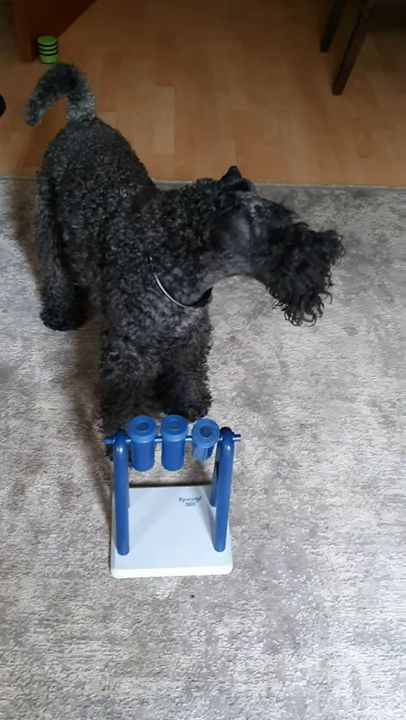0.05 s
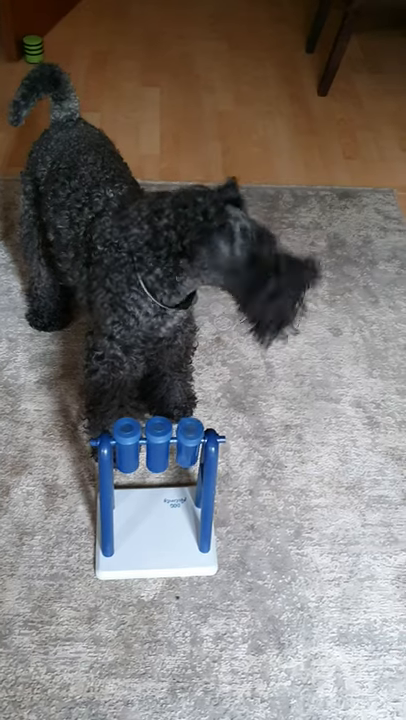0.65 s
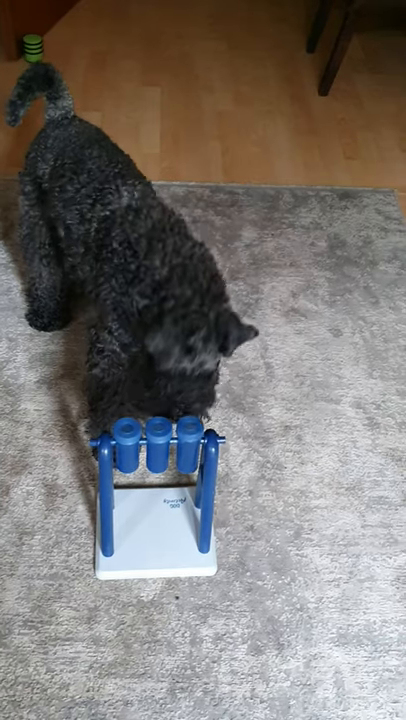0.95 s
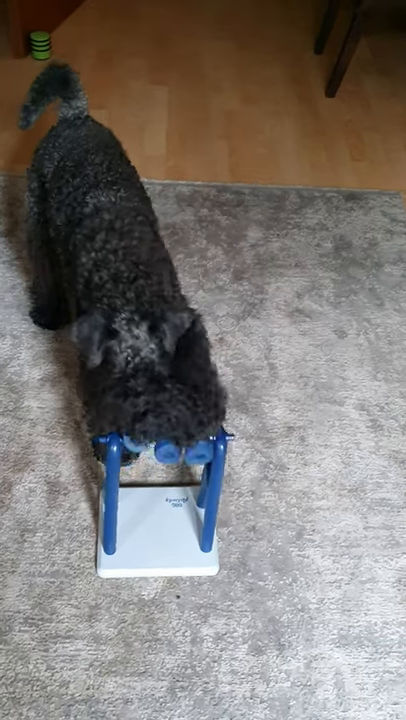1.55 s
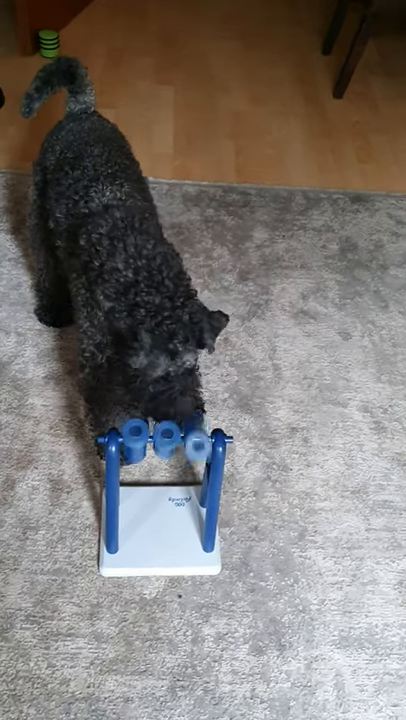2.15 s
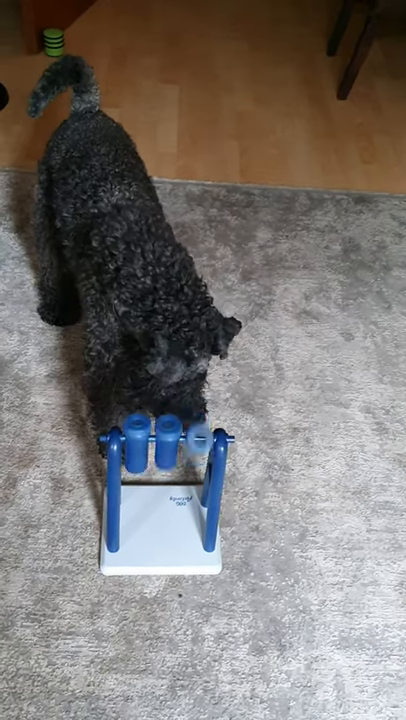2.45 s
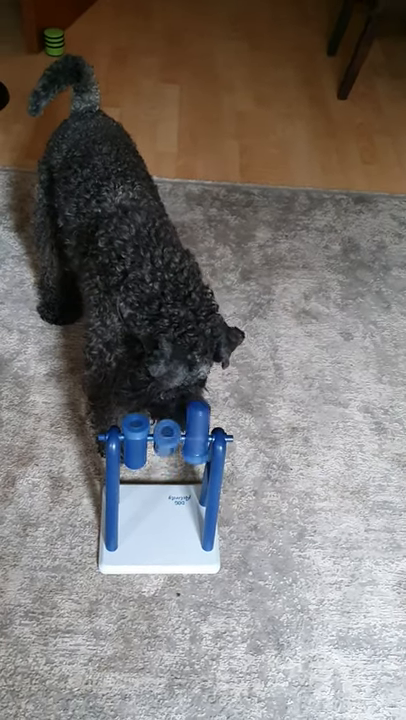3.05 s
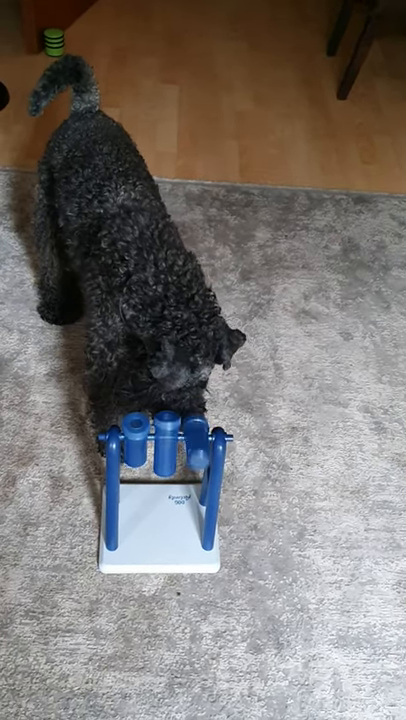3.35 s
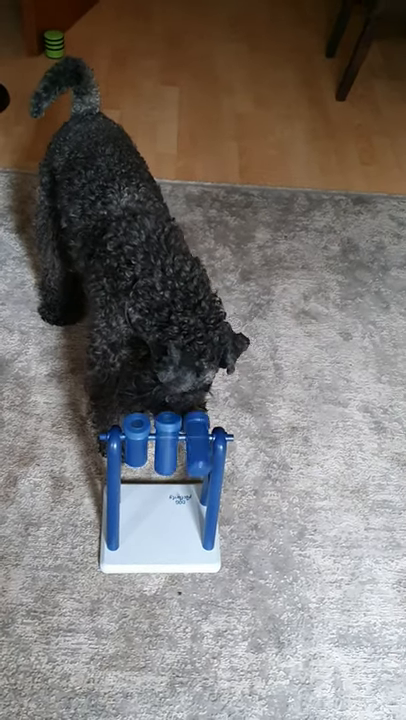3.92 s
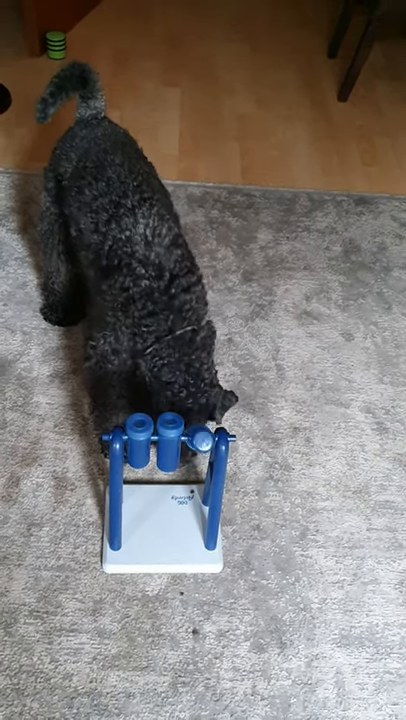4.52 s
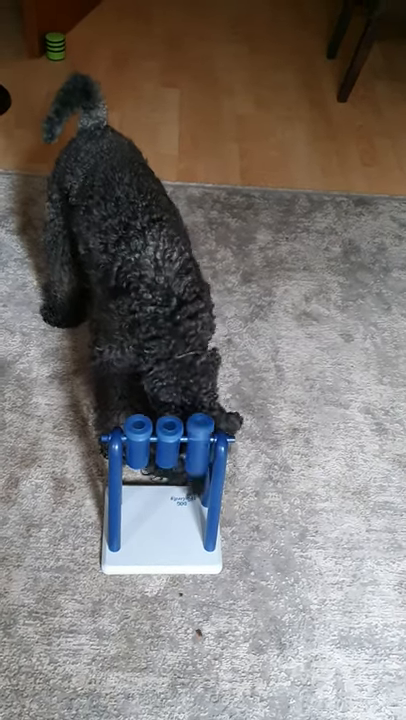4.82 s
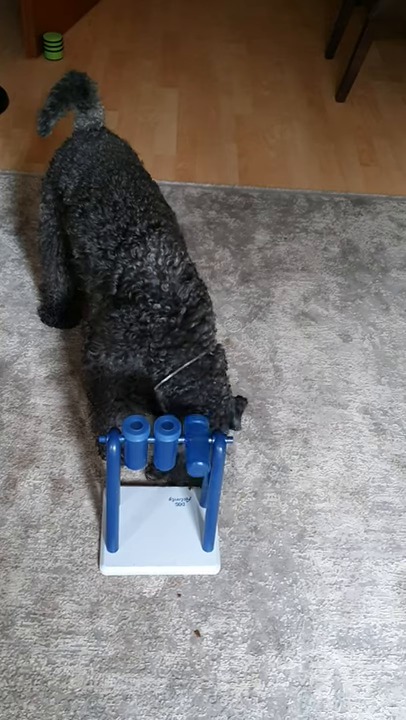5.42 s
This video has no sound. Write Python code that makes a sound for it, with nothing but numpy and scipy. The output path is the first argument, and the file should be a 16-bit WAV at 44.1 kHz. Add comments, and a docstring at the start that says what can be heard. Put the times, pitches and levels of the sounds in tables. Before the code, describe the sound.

In a quiet living room with faint hiss and low rumble, a dog pushes its muzzle into a plastic puzzle toy on a rug. Hinged hollow cylinders swing against their rod and frame in a loud clatter with one sharp crack. Shorter groups of knocks and light ticks follow between pauses, with soft rubbing. The stereo microphone is far enough away to catch a short room echo.

```python
"""Quiet hiss, low rumble and a faint airy tone in a living room; then a dog's coat brushes by.
The dog noses a puzzle toy on the rug, its muzzle rubbing the hollow plastic. Hinged cylinders swing and
knock on their rod and frame, once with a sharp crack and a clatter; small hard contacts ping.
The stereo microphone is far enough off to hear the room answer each blow."""
import sys
import numpy as np
from scipy import signal
from scipy.fft import rfft, irfft
from scipy.io import wavfile
from scipy.ndimage import uniform_filter1d

SR = 44100
rng = np.random.default_rng(int(sys.argv[2]) if len(sys.argv) > 2 else 0)


def dump(signal):
    """Clip the signal to [-1, 1] and save it as 16-bit WAV at the path in sys.argv[1]."""
    limited = np.clip(np.atleast_2d(signal).T, -1, 1)
    pcm = np.round(limited * 32767).astype(np.int16)
    wavfile.write(sys.argv[1], SR, pcm)


N = 246078
TIME = np.arange(N) / SR
FREQ = np.fft.rfftfreq(N, 1 / SR)


def amp(db):
    """Decibels to gain."""
    return 10 ** (np.asarray(db) / 20)


def unit(x):
    """Scales to rms 1."""
    return x / np.sqrt(np.mean(x ** 2) + 1e-20)


def read(points, hz):
    """Reads (Hz, value) points on a log-frequency axis."""
    f, value = np.transpose(points)
    return np.interp(np.log(hz + 1), np.log(f + 1), value)


def peak(hz, centre_hz, width_hz):
    """A resonance curve of height 1."""
    return 1 / (1 + (2 * (hz - centre_hz) / width_hz) ** 2)


def add(mix, s, sound):
    """Adds a sound to both channels at s seconds."""
    part = mix[:, round(s * SR):][:, :sound.shape[-1]]
    part += sound[..., :part.shape[1]]


def noise(gain, likeness):
    """Stereo noise of rms 1 with a given spectrum and left-right likeness."""
    left, other = rfft(rng.standard_normal((2, N)))
    right = likeness * left + np.sqrt(1 - likeness ** 2) * other
    return unit(irfft(np.array([left, right]) * gain, N))


def strokes(rows):
    """Gain over time of strokes that swell and fade smoothly."""
    return sum(amp(db) * np.sin(np.pi * np.clip((TIME - s) / length, 0, 1)) ** 2
               for s, length, db in rows)


# The room's hiss. Each row: frequency in Hz, relative level in dB.
HISS_COLOUR = [(200, 1.5), (310, -1), (450, -10.5), (580, -8.5), (750, -10.5), (1500, -15), (2500, -22.5),
               (3600, -13.5), (3950, -18), (4400, -11), (5600, -17.5), (6900, -14), (7300, -35),
               (16000, -26)]
# Its width at the microphone. Each row: frequency in Hz, left-right likeness from 0 to 1.
HISS_LIKENESS = [(100, 0.55), (300, 0.8), (1000, 0.25), (4000, 0.11), (16000, 0.34)]
# Steady low hums. Each row: pitch in Hz, width in Hz, level in dB.
ROOM_HUMS = [(105, 5.3, -79), (191, 6.1, -75), (230.6, 6.5, -73)]

def room_tone(hiss_db=-71.5):
    """Hiss all around the microphone, with low hums near the centre."""
    hiss = amp(hiss_db) * noise(amp(read(HISS_COLOUR, FREQ)), read(HISS_LIKENESS, FREQ))
    hums = sum(amp(db) * noise(peak(FREQ, hz, width), likeness=.91) for hz, width, db in ROOM_HUMS)
    return hiss + hums


# The low rumble. Each row: frequency in Hz, relative level in dB.
RUMBLE_SPECTRUM = [(10, -37), (25, -11.5), (48, 6), (70, 4.5), (90, -3.5), (140, -17.5), (220, -31.5),
                   (500, -63.5)]
# The dog shifts its weight. Each row: start in seconds, length in seconds, level in dB.
WEIGHT_SHIFTS = [(.28, 0.15, -64), (.47, 0.31, -66), (.88, 0.39, -60.5), (1.42, 0.65, -62.5),
                 (2.25, 0.47, -60), (2.6, 1, -66), (3.52, 0.25, -62), (4.48, 0.53, -64.5)]

def rumble(rest_db=-74, waver_db=2.5, waver_s=.11):
    """An uneven low rumble that swells as the dog moves."""
    waver = noise(np.exp(-(FREQ * waver_s) ** 2), likeness=.99)[0]
    level = amp(rest_db + waver_db * waver) + strokes(WEIGHT_SHIFTS)
    return level * noise(amp(read(RUMBLE_SPECTRUM, FREQ)), likeness=.94)


# One faint swell. Its row: start in seconds, length in seconds, level in dB.
AIRY_SWELL = [(0, 0.83, -77.5)]

def airy_tone(centre_hz=870, width_hz=140):
    """A narrow band of noise that comes and goes."""
    return strokes(AIRY_SWELL) * noise(peak(FREQ, centre_hz, width_hz), likeness=.5)


# Coat brushing and cylinders scraping on their rod.
# Each row: start in seconds, length in seconds, relative level in dB.
SCRAPE_STROKES = [(.18, 0.23, -77), (.52, 0.11, -70.5), (.62, 0.24, -75.5), (1.472, 0.056, -54),
                  (1.52, 0.2, -52.5), (1.735, 0.025, -44.5), (3.535, 0.088, -63.5), (4.17, 0.11, -63.5)]
# Their dry colour. Each row: frequency in Hz, relative level in dB.
SCRAPE_SPECTRUM = [(100, -18.5), (400, -0.5), (850, 6.5), (1400, -5), (2200, -8.5), (3000, -10), (5500, -7),
                   (7500, -20.5), (10000, -26.5), (15000, -27.5)]

def scrapes(scrape_db=-2, slips_db=3):
    """Dry friction that catches and slips every few milliseconds."""
    grip = unit(uniform_filter1d(rng.standard_normal(N), size=130))
    slips = unit(amp(slips_db * grip))
    friction = noise(amp(read(SCRAPE_SPECTRUM, FREQ)), likeness=.5)
    return amp(scrape_db) * strokes(SCRAPE_STROKES) * slips * friction


# The living room's decay. Each row: frequency in Hz, seconds to fall 60 dB.
ROOM_DECAY = [(100, .75), (250, .65), (700, 0.62), (2000, 0.47), (4000, 0.45), (8000, 0.4), (12000, 0.27),
              (16000, .28)]
# Its tail at the microphone. Each row: frequency in Hz, relative level in dB.
ROOM_COLOUR = [(100, -8), (190, 8.5), (330, 1.5), (700, 3), (2000, 7), (4500, 4), (9000, 4), (14000, 0)]
# The tail's width. Each row: frequency in Hz, left-right likeness from 0 to 1.
ROOM_LIKENESS = [(100, 0.67), (300, 0.98), (700, 0.5), (1500, 0), (3000, 0), (16000, 0)]

def room(x, build_s=.0097, first_s=.00033, echo_share=.54, echoes_per_s=400):
    """The rug swallows the first bounce; walls and furniture build a dense tail with stronger echoes."""
    t = np.arange(SR) / SR
    echoes = rng.standard_normal((2, SR)) * (rng.random((2, SR)) < echoes_per_s / SR)
    echoes *= np.exp(-t / .026)
    taps = rng.standard_normal((2, SR)) + echo_share * np.sqrt(SR / echoes_per_s) * echoes
    hz, when, (left, other) = signal.stft(taps, SR, nperseg=256)
    hz = hz[:, None]
    likeness, t60 = read(ROOM_LIKENESS, hz), read(ROOM_DECAY, hz)
    right = likeness * left + np.sqrt(1 - likeness ** 2) * other
    fade = np.exp(-np.log(1000) * when / t60) / np.sqrt(SR * t60 / (2 * np.log(1000)))
    bands = np.array([left, right]) * fade * amp(read(ROOM_COLOUR, hz))
    build = 1 - np.exp(-np.maximum(t - first_s, 0) / build_s)
    tail = signal.istft(bands, SR, nperseg=256)[1][:, :SR] * build
    return signal.fftconvolve(x, tail, axes=1)[:, :N]


def drone(hz=106, start_s=.8, rise_s=.11, fade_db_per_s=13, drone_db=-58):
    """A low hum comes up quickly, dead centre, and fades."""
    t = TIME - start_s
    level = np.clip(t / rise_s, 0, 1) * amp(drone_db - fade_db_per_s * t)
    return level * np.sin(2 * np.pi * hz * TIME)


# Muzzle on the toy. Each row: start in seconds, length in seconds, relative level in dB.
MUZZLE_STROKES = [(1.388, 0.056, -63.5), (1.721, 0.078, -43.5), (1.86, 0.09, -71), (2.11, 0.079, -57),
                  (2.405, 0.053, -50.5), (3.089, 0.068, -67.5), (3.232, 0.13, -64), (3.53, 0.095, -75.5),
                  (3.631, 0.18, -66.5), (4.152, 0.15, -62), (4.89, 0.05, -74.5), (5.268, 0.041, -69),
                  (5.315, 0.037, -65.5)]
# Their soft colour. Each row: frequency in Hz, relative level in dB.
MUZZLE_SPECTRUM = [(100, -33), (450, -11), (620, 5.5), (760, 11.5), (950, -6.5), (1500, -19), (2200, -17.5),
                   (3000, -27.5), (7000, -34.5), (14000, -41)]

def muzzle_rubs(rub_db=-2, hollow_hz=755, hollow_width_hz=90):
    """Soft friction sounds the hollow of the cylinders."""
    hollow = 1 + peak(FREQ, hollow_hz, hollow_width_hz)
    friction = noise(amp(read(MUZZLE_SPECTRUM, FREQ)) * hollow, likeness=.96)
    return amp(rub_db) * strokes(MUZZLE_STROKES) * friction


def causal(gain):
    """Minimum-phase spectrum of a gain: resonances ring after the blow."""
    log_gain = np.log(np.maximum(gain, 1e-6))
    circle = np.concatenate([log_gain, log_gain[-2:0:-1]])
    return np.exp(np.conj(signal.hilbert(circle)))[:len(gain)]


# Resonances of frame and hollow cylinders. Each row: pitch in Hz, width in Hz, relative level in dB.
SHELL_MODES = [(200, 67, 11.5), (568, 54, 6.5), (620, 13, 5.5), (685, 35, 13), (763.5, 16, 8.5),
               (905, 40, -0.5), (1008, 27, 6), (1150, 60, 7.5), (1280, 70, 5), (2083, 86, 6),
               (2130, 140, 6.5), (3630, 120, -4.5), (4435, 190, -5), (5623, 99, 1)]

def shell(hz, ring, spot_db=2):
    """The shell's gain around 1: each blow excites it differently; ring is how freely it sounds."""
    strike_db = spot_db * rng.standard_normal(len(SHELL_MODES))
    peaks = sum(amp(db + extra) ** 2 * peak(hz, centre, width)
                for (centre, width, db), extra in zip(SHELL_MODES, strike_db))
    power = (1 + peaks) ** ring
    return np.sqrt(power / uniform_filter1d(power, size=200))


# Cylinders hit rod and frame, down on the rug. Each row: start in seconds, contact time in seconds,
# strength in dB, hollow boom in dB, its pitch in Hz, treble of a hard edge in dB.
BLOWS = [(1.398, 0.0049, -26, 2, 750, -7), (1.479, 0.005, -23.5, 11, 800, 9.5),
         (1.497, .002, -30.5, 6, 750, 16), (1.515, .0036, -11, 6, 750, -3),
         (1.554, 0.0039, -6.5, 16, 639, -3), (1.576, .003, -12.5, 9, 650, -9),
         (1.606, 0.0031, -13.5, 18, 630, -16), (1.639, 0.00019, -2, -4, 720, 21),
         (1.704, .003, -13.5, 23.5, 699, 8), (1.728, .0021, 1, 0.5, 400, 2.5),
         (1.742, 0.00036, -20.5, 6, 720, 21), (1.749, 0.0007, -2, 2.5, 720, -3.5),
         (1.765, 0.00088, -7.5, 11, 564, -13), (1.792, .005, -17, 16, 620, -14),
         (1.884, 0.0021, -8.5, -12, 650, -9.5), (2.431, 0.0034, -19, 15.5, 750, -18),
         (2.449, 0.0017, -5.5, 11, 895, -11.5), (2.461, 0.0028, -13, 5.5, 950, -3.5),
         (2.482, 0.0021, -11.5, -4.5, 600, -13.5), (2.499, .002, -18, 13.5, 900, -19.5),
         (2.876, 0.0013, -46.5, 0.5, 750, 23), (3.094, 0.00068, -31.5, 9.5, 900, -4.5),
         (3.143, 0.00026, -37.5, 14.5, 750, 30.5), (3.149, .0007, -32.5, 5.5, 750, 9),
         (3.2215, .0012, -40, 22, 758, 12), (3.2425, 0.0012, -43.5, 23, 760, 21.5),
         (3.603, 0.0033, -44, 33, 740, 36.5), (3.649, .0016, -35, 26.5, 730, 23),
         (3.8728, 0.001, -11.5, 6.5, 854, 4), (3.876, 0.00034, -15.5, 13.5, 896, 10.5),
         (3.981, 0.00072, -20, 4, 1100, -4), (4.178, .004, -42, 9, 750, 21.5),
         (4.237, .0008, -32.5, 13.5, 755, 23), (4.346, 0.00076, -25.5, 14.5, 680, 10),
         (4.377, 0.0013, -31, 11, 600, -8.5), (4.621, 0.00039, -13.5, 7, 964, 12.5),
         (4.6245, 0.00029, -23, 7.5, 1150, 15.5), (4.662, .002, -27, 18, 560, -9.5),
         (4.772, .002, -30.5, 10, 1000, -12)]
# The colour all blows share. Each row: frequency in Hz, relative level in dB.
BLOW_COLOUR = [(270, -1.5), (720, 0), (1750, -4.5), (3200, -7.5), (4800, -11), (10500, -24), (15750, -31)]
# Where a hard edge adds treble. Each row: frequency in Hz, multiplier of the edge's dB.
EDGE_TREBLE = [(1750, 0), (4800, 0.913), (10500, 1.0689), (15750, 1.03)]

def knocks(snap_s=.0006, chatter_s=.0028, hollow_octaves=.76, low_hz=175, top_hz=13600):
    """Hard blows snap, soft ones swell over a few ms of chatter; both ring through the plastic shell."""
    out, size = np.zeros((2, N)), 8192
    hz, t = np.fft.rfftfreq(size, 1 / SR), np.arange(size) / SR
    band = 1 / np.sqrt((1 + (low_hz / (hz + 1)) ** 8) * (1 + (hz / top_hz) ** 12))
    ports = np.exp(-2j * np.pi * hz * np.array([[.00004], [0]]))  # the right microphone port hears first
    apart = np.clip((hz - 400) / 4000, 0, 1)  # short waves reach the two ports differently
    taper = np.cos(np.pi / 2 * t / t[-1]) ** 2
    for s, contact_s, strength_db, hollow_db, hollow_hz, edge_db in BLOWS:
        swell = (1 - np.exp(-t / contact_s)) * np.exp(-t / (chatter_s + contact_s / 2))
        scatter = rfft(rng.standard_normal((3, size)) * swell)
        chatter = np.sqrt(1 - apart) * scatter[2] + np.sqrt(apart) * scatter[:2]
        chatter /= np.sqrt(np.mean(abs(chatter) ** 2))
        snap = np.exp(-contact_s / snap_s)
        force = snap + np.sqrt(1 - snap ** 2) * chatter
        # chatter spreads a blow in time and keeps its strength
        force /= np.sqrt(uniform_filter1d(np.mean(abs(force) ** 2, axis=0), size=70))
        boom_db = hollow_db * np.exp(-(np.log2((hz + 1) / hollow_hz) / hollow_octaves) ** 2)
        colour = amp(strength_db + read(BLOW_COLOUR, hz) + boom_db + edge_db * read(EDGE_TREBLE, hz))
        ring = np.clip(.25 + contact_s / .0022, 0, 1)  # a longer push sets more of the shell ringing
        response = causal(colour * shell(hz, ring) * band)
        add(out, s, irfft(force * ports * response) * taper)
    return out


def plastic_mode(hz, db, t60, rise_s, rattle_db, rattle_hz):
    """One high mode of the plastic, rattling against the contact as it dies away."""
    t = np.arange(SR // 10) / SR
    fade = amp(db) * np.exp(-np.log(1000) * t / t60) * (1 - np.exp(-t / rise_s))
    spread = np.exp(-(np.fft.fftfreq(len(t), 1 / SR) / rattle_hz) ** 2)
    rattle = np.fft.ifft(spread * np.exp(2j * np.pi * rng.random((2, len(t)))))
    rattle *= amp(rattle_db) / np.sqrt(np.mean(abs(rattle) ** 2))
    tone = np.exp(2j * np.pi * hz * t - 1j * np.array([[.9], [0]]))  # the left port lags in phase
    return fade * ((1 + rattle) * tone).imag


# Small hard contacts. Each row: start in seconds, relative level in dB, favoured pitch in Hz.
CONTACTS = [(1.447, -57, 5270), (1.6621, -28, 4503), (1.7146, -22, 5440), (2.876, -45, 5400),
            (3.221, -51, 5350), (3.2421, -36.5, 5410), (3.6052, -38, 3770), (3.649, -42, 3960)]
# A cylinder's high modes. Each row: pitch in Hz, relative level in dB, seconds to fall 60 dB.
CYLINDER_MODES = [(3787, -1, .035), (4070, -4.5, .03), (4540, -9.5, .012), (5190, -5.5, 0.014),
                  (5375, 0, .01), (5720, -6.5, 0.012)]

def pings(ping_db=4, fall_db_per_octave=32):
    """Small contacts ring a cylinder almost cleanly; modes far from the favoured pitch answer less."""
    out = np.zeros((2, N))
    for s, db, favoured_hz in CONTACTS:
        for hz, mode_db, t60 in CYLINDER_MODES:
            away_db = fall_db_per_octave * abs(np.log2(hz / favoured_hz))
            level_db = ping_db + db + mode_db - away_db
            add(out, s, plastic_mode(hz, level_db, t60, rise_s=.001, rattle_db=-10.5, rattle_hz=220))
    return out


# The toy's stiff modes. Each row: pitch in Hz, relative level in dB, seconds to fall 60 dB.
STIFF_MODES = [(2010, -22.5, 0.014), (3252, -15.5, .008), (4333, -22, 0.014), (6470, -27, 0.0091),
               (8800, -26, 0.0087), (11510, -23, .009), (13200, -23, .012)]

def crack(start_s=1.639, crack_db=-2, right_db=2.5):
    """The hardest blow rattles the stiff modes all at once, a little right of the microphone."""
    out = np.zeros((2, N))
    for hz, db, t60 in STIFF_MODES:
        add(out, start_s, plastic_mode(hz, db, t60, rise_s=.0003, rattle_db=0, rattle_hz=.11 * hz))
    return out * amp(crack_db + right_db * np.array([[-.5], [.5]]))


# The toy's left-right balance: mid treble leans left, high treble right.
# Each row: frequency in Hz, left minus right in dB.
TOY_BALANCE = [(60, -2), (250, -2), (700, -0.3), (2000, 1), (4800, 3), (10000, -3.5), (16000, 1)]

def scene(room_db=-.5):
    """The toy and its echo as they reach the microphone, over the living room's background."""
    toy = knocks() + pings() + crack() + muzzle_rubs() + scrapes()
    in_room = toy + amp(room_db) * room(toy)
    sides = amp(np.array([[.5], [-.5]]) * read(TOY_BALANCE, FREQ))
    balanced = irfft(rfft(in_room) * sides, N)
    return balanced + room_tone() + rumble() + drone() + airy_tone()


def record(dry):
    """The recorder cuts the treble above 15750 Hz."""
    lowpass = signal.firwin(511, 15750, window=("kaiser", 9), fs=SR)
    return signal.oaconvolve(dry, lowpass[None], "same")


dry = scene()
out = record(dry)
dump(out)
```